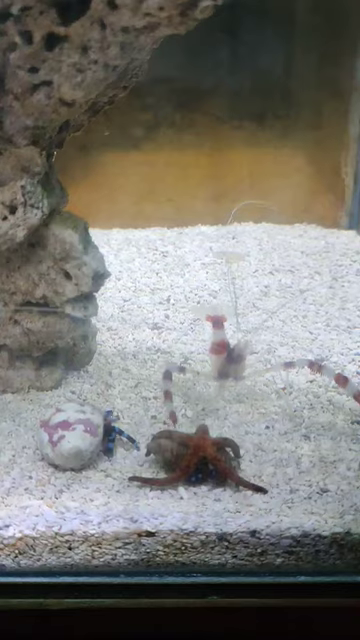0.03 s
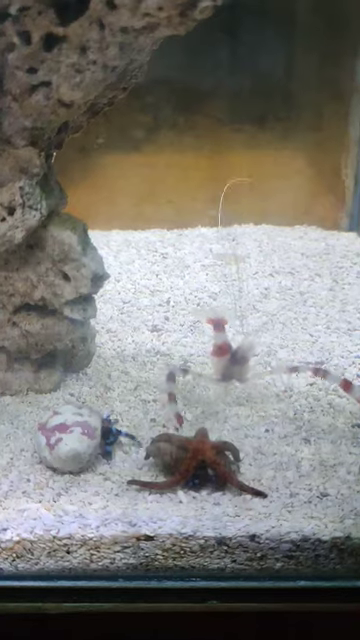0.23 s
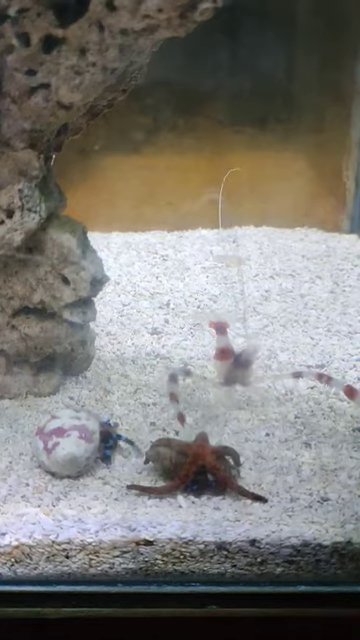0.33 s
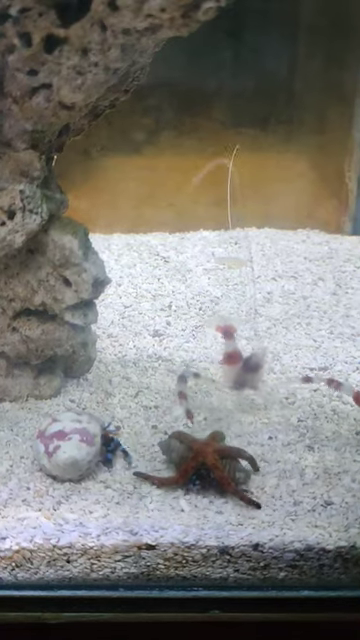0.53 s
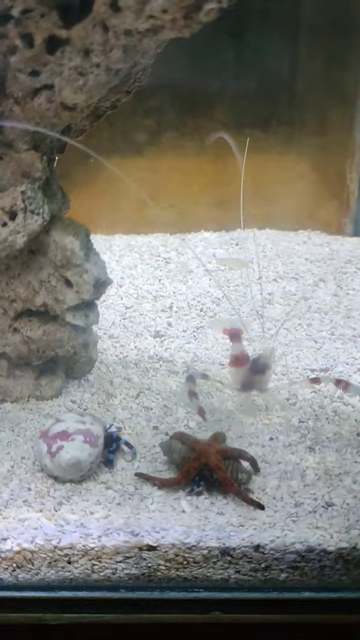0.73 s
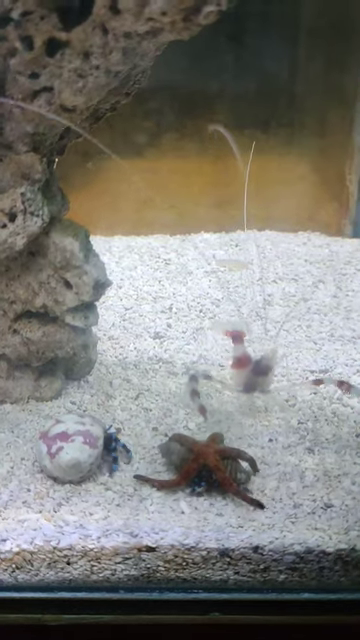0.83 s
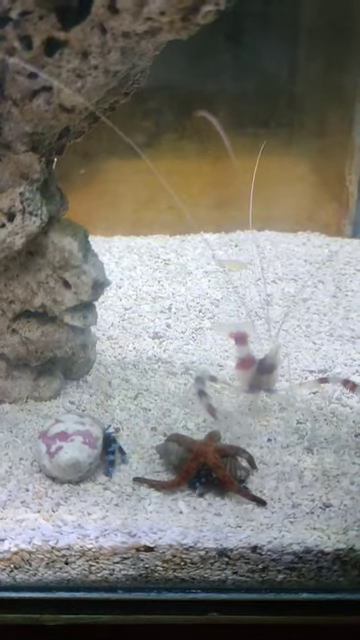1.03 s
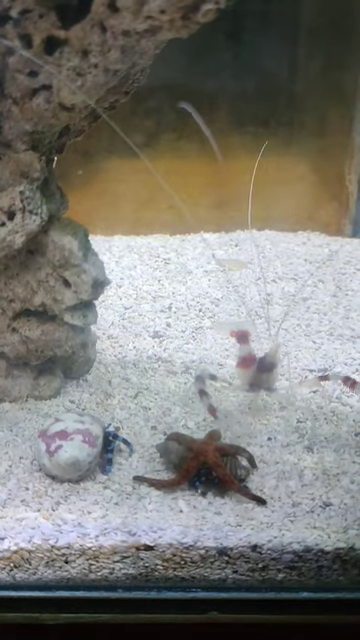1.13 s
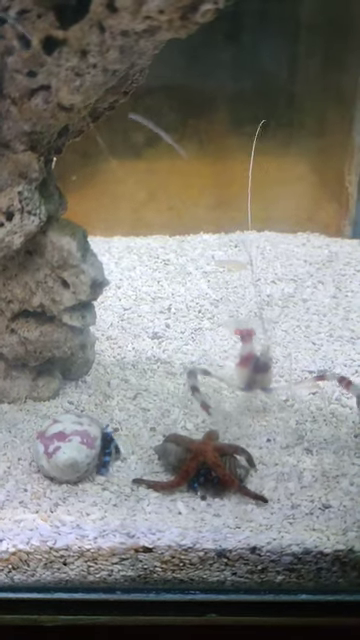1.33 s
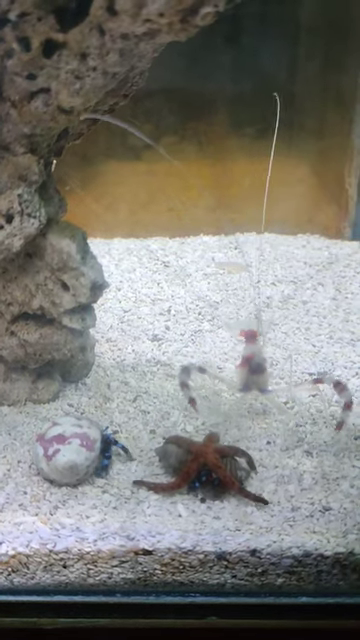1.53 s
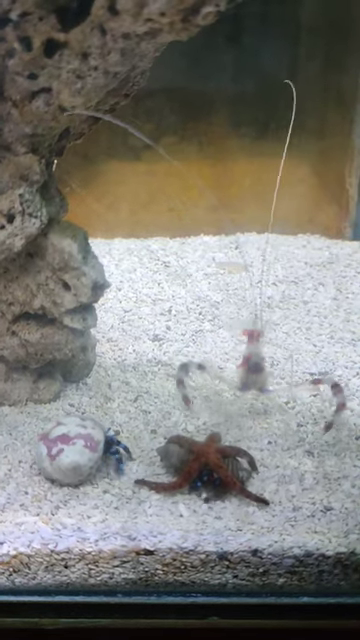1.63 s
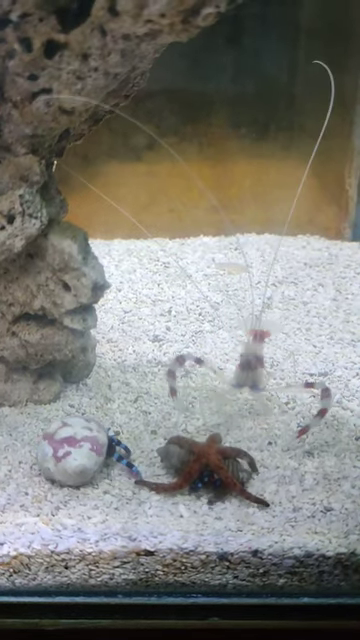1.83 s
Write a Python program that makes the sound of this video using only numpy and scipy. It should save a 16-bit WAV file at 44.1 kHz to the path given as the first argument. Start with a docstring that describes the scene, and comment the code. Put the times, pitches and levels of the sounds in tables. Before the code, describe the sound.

The low, steady hum of an aquarium pump fades in with water hiss and several quick electrical pops on the right. Tiny bubbles tick faintly in the quiet room, and handling near the microphone adds a small scratch and soft bump.

```python
"""In a quiet room, an aquarium pump throbs on multiples of the mains frequency over the hiss of
circulating water. The flow makes the pump's housing ring, and tiny bubbles tick faintly.
The camera's input fades up, with a few electrical pops on the right as its offset (resting level)
settles. A finger brushes the camera's case and gives one small scratch and a soft bump."""
import sys
import numpy as np
from scipy import signal
from scipy.fft import rfft, irfft
from scipy.io import wavfile
from scipy.ndimage import uniform_filter1d

SR = 44100
rng = np.random.default_rng(int(sys.argv[2]) if len(sys.argv) > 2 else 0)


def transcribe(u):
    """Save the signal u as a 16-bit wav file named by the first command-line argument.

    u: samples, shape (n,) or (channels, n), limited to [-1, 1]; the rate is SR.
    q: integer samples, one column per channel.
    """
    v = np.clip(np.atleast_2d(u).T, -1, 1)
    q = np.round(v * 32767).astype(np.int16)
    wavfile.write(sys.argv[1], SR, q)


N = 83790
TIME, FREQS = np.arange(N) / SR, np.fft.rfftfreq(N, 1 / SR)
LEFT_DELAY_S = .0003  # the pump's sound reaches the right microphone first
WAKE_S = .12  # the input switches on


def amp(db):
    """Turns decibels into a gain."""
    return 10 ** (np.asarray(db) / 20)


def evened(x):
    """Scales a signal to an average (rms) level of 1."""
    return x / np.sqrt(np.mean(x ** 2) + 1e-20)


def curve(points):
    """Joins rows of (Hz, value) into a curve over all frequencies."""
    hz, value = np.transpose(points)
    return np.interp(np.log(FREQS + 1), np.log(hz + 1), value)


def drift(rate_hz):
    """A slow random wander, about 1 in size."""
    slow_only = np.exp(-(FREQS / rate_hz) ** 2) * (FREQS > 0)
    return evened(irfft(rfft(rng.standard_normal(N)) * slow_only, N))


def room_and_water():
    """The room rumbles, much alike on both sides, and moving water hisses from all around."""
    # Each row: frequency in Hz, relative level in dB.
    spectrum = [(10, -3), (28, -11.5), (45, -9.5), (70, -14), (115, -18), (160, -24), (260, -22.5),
                (430, -23), (560, -29.5), (800, -32.5), (1200, -33.5), (1900, -33), (3000, -36.5),
                (5000, -42.5), (7000, -45.5), (9800, -49), (14000, -47.5)]
    # Each row: frequency in Hz, how alike left and right are (1 the same, 0 unrelated, -1 opposite).
    likeness = [(10, 0), (60, 0.67), (150, 0.7), (300, 0.56), (500, 0.74), (900, 0.03), (1300, -.25),
                (2200, 0.16), (4000, 0)]
    # Each row: centre in Hz, width in Hz, left boost in dB, right boost in dB.
    resonances = [(708, 64, 3.5, 6), (886, 69, -5, 11), (1573, 45, 6.5, 4.5), (2343, 77, 6, -1.5),
                  (3350, 520, -1.5, 1.5), (4080, 65, -3.5, 7.5), (7370, 1500, -0.5, 7.5),
                  (8240, 2100, 4.5, -1.5)]
    left, other = rfft(rng.standard_normal((2, N)))
    alike = curve(likeness)
    right = alike * left + np.sqrt(1 - alike ** 2) * other
    base_db = curve(spectrum)
    boost_db = sum(np.array([[left_db], [right_db]]) / (1 + (2 * (FREQS - centre) / width) ** 2)
                   for centre, width, left_db, right_db in resonances)
    noise = irfft(np.array([left, right]) * amp(base_db + boost_db), N)
    noise *= amp(db=-58) / np.sqrt(np.mean(amp(base_db) ** 2))
    # Small patches of time and pitch get about 2 dB louder or softer.
    grid = signal.stft(noise, nperseg=512, noverlap=384)[2]
    patches = uniform_filter1d(rng.standard_normal(grid.shape), size=10, axis=1)
    patches = evened(uniform_filter1d(patches, size=10, axis=2))
    return signal.istft(grid * amp(2 * patches), nperseg=512, noverlap=384)[1][:, :N]


def bubbles():
    """Tiny bubbles ring for a few milliseconds, mostly on the right."""
    # Each row: start in seconds, pitch in Hz, peak level on the right in dB.
    ticks = [(.302, 7370, -56.5), (0.49, 1610, -66), (1.011, 3650, -64.5), (1.191, 3730, -62),
             (1.193, 3100, -58), (1.535, 3100, -58.5), (1.619, 1590, -55.5)]
    rise_s, left_db = .00094, -18
    out = np.zeros((2, N))
    for start, hz, db in ticks:
        age = np.maximum(TIME - start, 0) / rise_s
        out += amp(db) * age * np.exp(1 - age) * np.sin(2 * np.pi * (hz * TIME + rng.random((2, 1))))
    return out * amp([[left_db], [0]])


def finger_rubs():
    """A finger rubs the case, and the friction makes short, high hisses."""
    # Each row: start, rise, hold and fade in seconds, centre in Hz, half width in octaves, level in dB.
    rubs = [(0.465, 0.0096, 0.092, 0.1, 6070, 0.43, -72.5),
            (0.687, 0.0011, 0.0073, 0.0048, 6570, 0.32, -65),
            (1.513, 0.0087, 0.096, 0.076, 5550, 0.73, -78)]
    out = np.zeros((2, N))
    for start, rise, hold, fade, centre, octaves, db in rubs:
        band = np.exp(-.5 * (np.log2((FREQS + 1) / centre) / octaves) ** 2)
        age = TIME - start
        level = np.clip(age / rise, 0, 1) * np.exp(-np.maximum(age - rise - hold, 0) / fade)
        out += amp(db) * level * evened(irfft(rfft(rng.standard_normal((2, N))) * band, N))
    return out


def hand_bump(start_s=.764, hz=46, rise_s=.016, db=-52):
    """The hand bumps the case: a few low cycles swell and die away."""
    age = np.maximum(TIME - start_s, 0)
    swell = age / rise_s * np.exp(1 - age / rise_s)
    return amp(db) * swell * np.sin(2 * np.pi * hz * age)


def pump_housing():
    """The noise of the flow makes the pump's housing ring at a few pitches."""
    # Each row: pitch in Hz, width in Hz, left level in dB, right level in dB.
    rings = [(432, 24, -81, -76.5), (910, 70, -78, -76), (1572, 85, -77, -72.5)]
    delay = np.exp(-2j * np.pi * FREQS * np.array([[LEFT_DELAY_S], [0]]))
    out = np.zeros((2, N))
    for centre, width, left_db, right_db in rings:
        ring = rfft(rng.standard_normal(N)) / (1 + (2 * (FREQS - centre) / width) ** 2)
        out += amp([[left_db], [right_db]]) * evened(irfft(ring * delay, N))
    return out


def pump():
    """Each pump stroke starts all the hum's tones together, so it throbs over a low motor drone."""
    # Each row: multiple of the mains frequency, left level in dB, right level in dB.
    tones = [(2, -69, -69), (3, -80, -80.5), (4, -74, -72.5), (5, -82, -82), (6, -76.5, -73.5),
             (7, -78.5, -79.5), (8, -69, -70), (9, -72.2, -71.4), (10, -76, -76), (11, -83.5, -96),
             (12, -95, -86), (13, -98, -87), (14, -91, -81), (16, -90, -87.5), (17, -98, -83),
             (18, -78, -76.7), (20, -82, -82), (22, -87, -86), (26, -89, -102)]
    mains_hz, drone_hz, drone_db = 50.055, 41.3, -65.5
    first_stroke_s, late_s_per_hz = .0089, 8.5e-6  # higher tones arrive a little later
    scatter_rad, waver_rad, waver_db, drone_waver_db = .55, .06, .85, 2
    clock = np.array([TIME - LEFT_DELAY_S, TIME]) - first_stroke_s
    out = np.zeros((2, N))
    for multiple, left_db, right_db in tones:
        hz = multiple * mains_hz
        phase = 2 * np.pi * hz * (clock - late_s_per_hz * hz / 2)
        phase += scatter_rad * rng.standard_normal() + waver_rad * drift(rate_hz=1.9)
        out += amp([[left_db], [right_db]]) * amp(waver_db * drift(rate_hz=5.4)) * np.sin(phase)
    drone_level = amp(drone_db + drone_waver_db * drift(rate_hz=13))
    out += drone_level * np.sin(2 * np.pi * (drone_hz * TIME + rng.random()))
    return np.sqrt(2) * out  # makes the levels above averages (rms), not peaks


def input_pops(settle_s=.5, cutoff_hz=6800, swing_height=.057, swing_rise_s=.2114):
    """The right input's offset swings slowly and settles; each sudden jump in it is a pop."""
    # Each row: time in seconds, size of the jump (1 is full scale).
    pops = [(.1254, .0031), (.1854, -.0128), (.2454, -.0112), (.3054, -.0058), (.3454, -.007)]
    age = np.maximum(TIME - WAKE_S, 0) / swing_rise_s
    swing = swing_height * (age * np.exp(1 - age)) ** 1.75
    jumps = sum(size * (TIME >= start) * np.exp(-np.maximum(TIME - start, 0) / settle_s)
                for start, size in pops)
    smoothing = np.exp(-2 * np.pi * cutoff_hz / SR)
    return swing + signal.lfilter([1 - smoothing], [1, -smoothing], jumps)


def scene():
    """The pump, the water and the hand, as they reach the microphones."""
    return pump() + pump_housing() + room_and_water() + bubbles() + finger_rubs() + hand_bump()


def record(dry):
    """The input switches on, fades up and pops on the right; the highest treble is cut off."""
    first_gain, ramp_s, cutoff_hz = .12, .28, 14280
    gain = (TIME >= WAKE_S) * np.clip(first_gain + (TIME - WAKE_S) / ramp_s, 0, 1)
    with_pops = dry * gain + np.array([np.zeros(N), input_pops()])
    treble_cut = signal.firwin(801, cutoff_hz, window=("kaiser", 9), fs=SR)
    return signal.oaconvolve(with_pops, treble_cut[None], "same")


dry = scene()
out = record(dry)
transcribe(out)
```